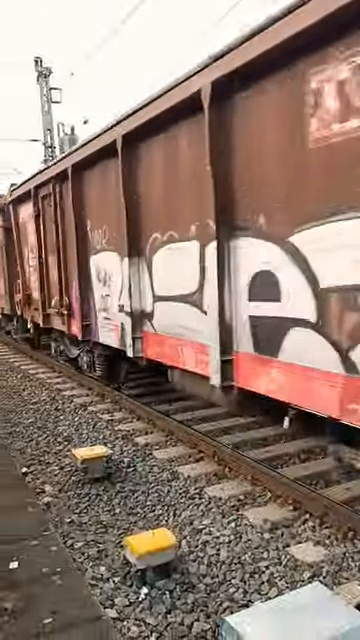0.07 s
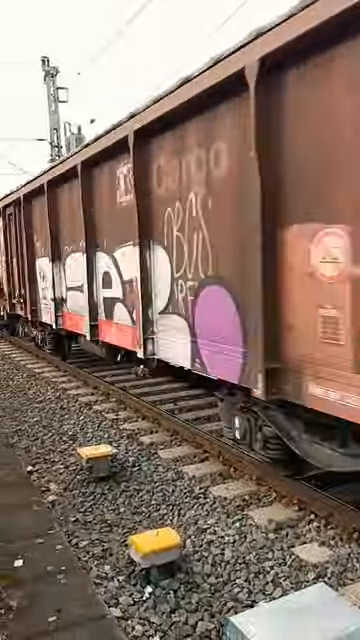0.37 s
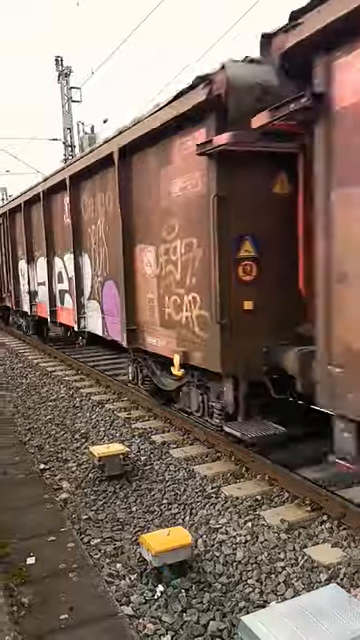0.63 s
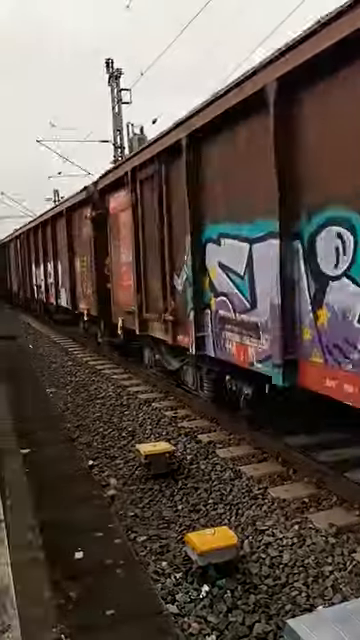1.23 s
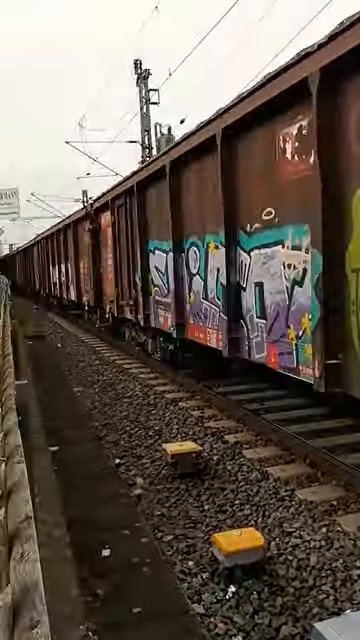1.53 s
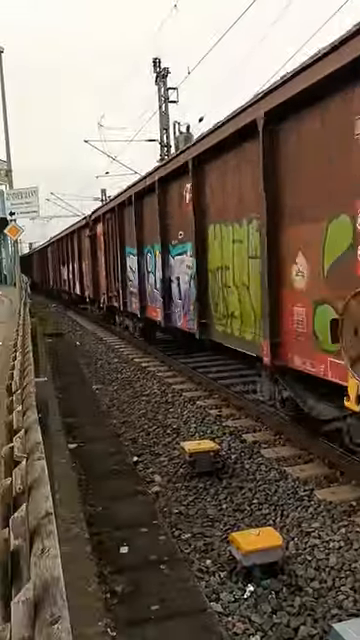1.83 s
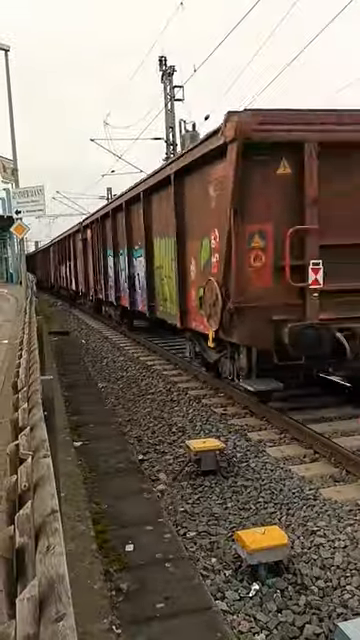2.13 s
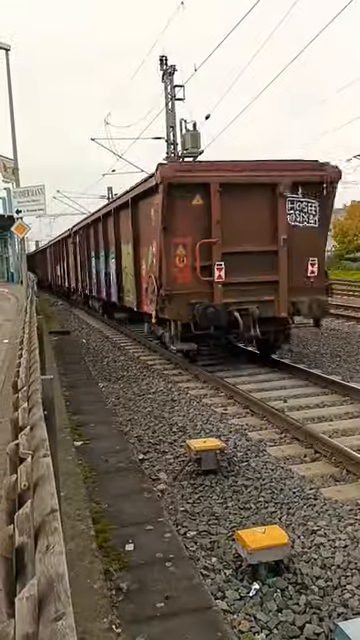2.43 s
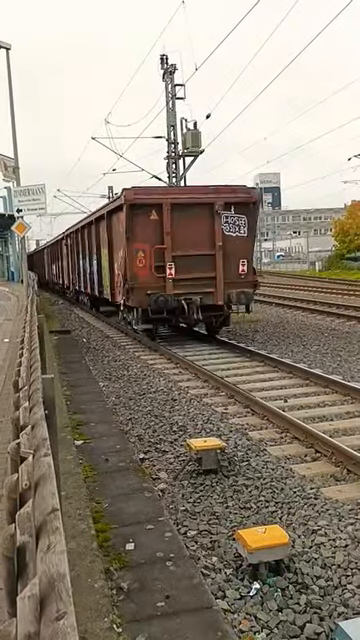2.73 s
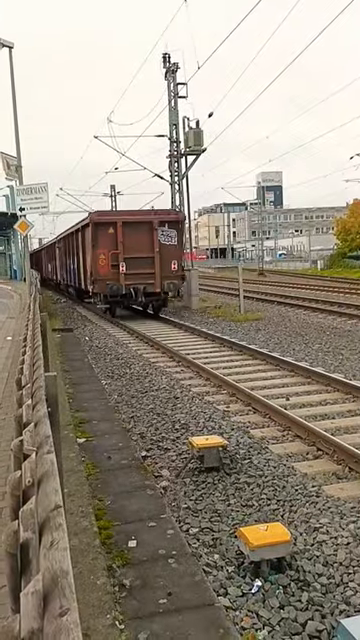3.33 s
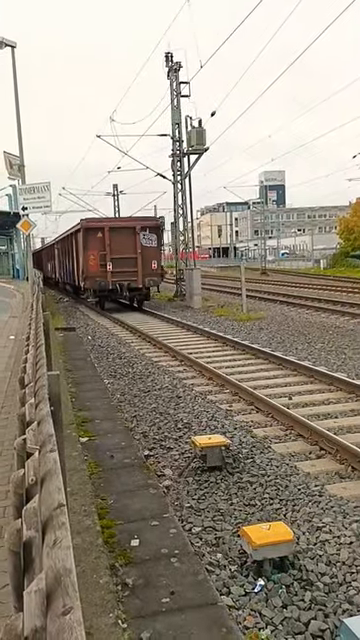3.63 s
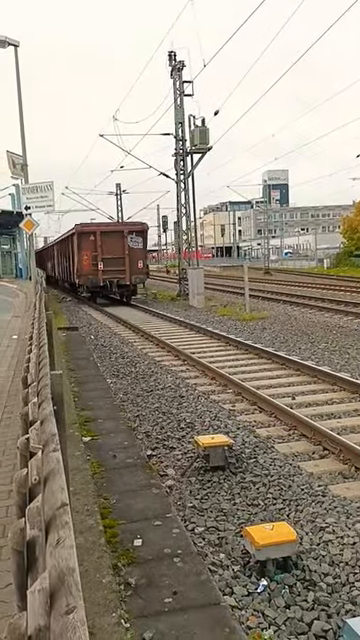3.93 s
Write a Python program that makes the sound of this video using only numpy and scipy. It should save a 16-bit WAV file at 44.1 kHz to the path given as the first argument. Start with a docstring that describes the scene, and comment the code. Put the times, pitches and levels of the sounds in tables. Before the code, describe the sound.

A freight train's last wagons roll by with rumble, clanks and hissing wheels, then recede.

```python
"""Rumble and wheel thuds as the last open wagons of a freight train pass a trackside microphone pair.
Hollow steel bodies boom, couplings clank, and flanges scrape the rail, squeal briefly and grind in
two long hisses, one near, one far. The train draws away with distant clacks and light wind in its wake.
It is to the right, so the left channel hears it later."""
import sys
import numpy as np
from scipy import signal
from scipy.fft import rfft, irfft, next_fast_len
from scipy.io import wavfile
from scipy.ndimage import uniform_filter1d, map_coordinates

SR = 44100
rng = np.random.default_rng(int(sys.argv[2]) if len(sys.argv) > 2 else 0)


def inscribe(sig):
    """Save sig as 16-bit PCM at rate SR to the path in sys.argv[1].

    A 1-D sig is mono; a 2-D sig holds one channel per row.
    Samples are clipped to [-1, 1] before scaling.
    """
    pcm = np.round(np.clip(np.atleast_2d(sig).T, -1, 1) * 32767)
    wavfile.write(sys.argv[1], SR, pcm.astype(np.int16))


N = 176400
T = np.arange(N) / SR

# likeness of the two channels: freq_hz, correlation
NEAR_COHERENCE = [(120, 0.91), (300, 1), (500, 0.73), (720, 1), (1000, 0), (1400, 0.43), (2200, 0.23),
                  (3200, 0.1), (10000, 0.1)]
FAR_COHERENCE = [(250, 0.88), (450, 0.97), (700, 0.92), (1400, 0.14), (2300, 0.36), (3300, 0.05),
                 (10000, 0.19)]
NEAR_LAG_S, FAR_LAG_S = 0.000824, 0.00096  # left behind right


def amp(db):
    """Decibels to gain."""
    return 10 ** (np.asarray(db) / 20)


def unit(x):
    """Scale to rms 1."""
    return x / np.sqrt(np.mean(x ** 2) + 1e-20)


def along(points, hz):
    """Interpolate (freq_hz, value) rows on a log axis."""
    freqs_hz, values = np.transpose(points)
    return np.interp(np.log(hz + 1), np.log(freqs_hz + 1), values)


def level(rows):
    """Gain from (time_s, level_db) rows, fading 69 dB/s beyond their ends."""
    times_s, db = np.transpose(rows)
    outside_s = np.abs(T - np.clip(T, times_s[0], times_s[-1]))
    return amp(np.interp(T, times_s, db) - 69 * outside_s)


def gate(start_s, hold_s, attack_s, release_s):
    """Linear attack, exponential release from start_s + hold_s."""
    return np.clip((T - start_s) / attack_s, 0, 1) * np.exp(-np.maximum(T - start_s - hold_s, 0) / release_s)


def wobble(knots_per_s):
    """Smooth random curve, rms about 1."""
    return map_coordinates(rng.standard_normal(int(N * knots_per_s / SR) + 4), [T * knots_per_s])


def filtered(x, response):
    """Apply the frequency response response(hz)."""
    size = next_fast_len(N + SR // 4)
    return irfft(rfft(x, size) * response(np.fft.rfftfreq(size, 1 / SR)), size)[..., :N]


def from_right(x, lag_s):
    """Two channels, the left one later."""
    return filtered(x, lambda hz: np.exp(1j * np.pi * hz * lag_s * np.array([[-1], [1]])))


def rush(spectrum, coherence, lag_s, patchy_db, rail_ring=0):
    """Stereo noise, rms 1, with narrow resonances coming and going; rail_ring adds the rail's."""
    bins_hz, frames_s, cells = signal.stft(rng.standard_normal((2, N)), SR, nperseg=1024)
    patches = uniform_filter1d(rng.standard_normal(cells.shape[1:]), size=2, axis=0)
    patches = uniform_filter1d(patches, size=7, axis=1)
    lift_db = rail_ring * rail_lift_db(bins_hz, frames_s) if rail_ring else 0
    pair = signal.istft(cells * amp(patchy_db * unit(patches) + lift_db), nperseg=1024)[1][:, :N]

    def mid_side_gains(hz):
        angle = np.arccos(np.clip(along(coherence, hz), -1, 1)) / 2
        return amp(along(spectrum, hz)) * [np.cos(angle), np.sin(angle)]

    mid, side = filtered(pair, mid_side_gains)
    return unit(from_right(np.array([mid + side, mid - side]), lag_s))


def ringing(modes):
    """Stereo noise, rms 1, through narrow resonances."""
    def response(hz):
        return sum(amp(db) / (1 + ((hz - centre_hz) / width_hz) ** 2) for centre_hz, width_hz, db in modes)

    shake = rng.standard_normal(N) + 0.5 * rng.standard_normal((2, N))
    return unit(filtered(shake, response))


def rolling():
    """Low rumble and the roar of wheel on rail, from the nearest wagons and the train beyond."""
    # envelopes: time_s, level_db
    rumble_levels = [(0, -19), (.35, -21.5), (.44, -19), (.56, -17.5), (.88, -26), (1.05, -19.5),
                     (1.26, -25), (1.37, -21), (1.53, -26), (1.63, -24.5), (1.93, -37), (2.05, -36.5),
                     (2.3, -32.5), (2.6, -40.5)]
    roar_levels = [(0, -31), (.5, -25.5), (.85, -29), (.92, -32), (1.04, -24.5), (1.125, -28.5),
                   (1.18, -30.5), (1.26, -32), (1.4, -34), (1.6, -35.5), (2.05, -45.5), (2.2, -59)]
    far_roar_levels = [(0, -42), (2.2, -33), (2.45, -38), (3.1, -33.5), (3.4, -39.5), (4, -41)]
    # spectra: freq_hz, density_db
    rumble_spectrum = [(15, -35), (30, -30), (50, -12.5), (75, -0.7), (110, -2), (170, -6.5), (260, -0.5),
                       (330, -2.5), (420, -13.5), (600, -13.5), (1000, -33), (2500, -55)]
    far_rumble_spectrum = [(15, -25), (30, -13), (50, -0.5), (75, 1), (115, 0.3), (170, -4.5), (250, 2.5),
                           (320, -9.5), (420, -13.5), (700, -22), (2000, -51)]
    roar_spectrum = [(200, -10), (450, 3.5), (650, 0), (900, -1.5), (1400, -6), (2400, -12.5),
                     (3300, -13.5), (9000, -20), (15000, -32)]
    far_roar_spectrum = [(200, -15), (450, 0), (650, 0.5), (860, 4), (1400, -2.5), (2050, -1), (2750, -2),
                         (3300, -7.5), (5000, -11), (9000, -15.5), (12000, -18.5), (15000, -38)]
    near, far = (NEAR_COHERENCE, NEAR_LAG_S), (FAR_COHERENCE, FAR_LAG_S)
    rumble = level(rumble_levels) * amp(1.3 * wobble(25.23)) * rush(rumble_spectrum, *near, patchy_db=4)
    far_rumble = amp(-32) * rush(far_rumble_spectrum, *far, patchy_db=1)
    roar = level(roar_levels) * amp(2.28 * wobble(25.24)) * rush(roar_spectrum, *near, patchy_db=2.5)
    far_gain = level(far_roar_levels) * amp(1.6 * wobble(25.36))
    far_roar = far_gain * rush(far_roar_spectrum, *far, patchy_db=3)
    return rumble + far_rumble + roar + far_roar


def flanges():
    """Flanges rub the rail head with an uneven hiss, more hollow and ringing further away."""
    # long grinds: time_s, relative_db
    near_grind = [(1.28, -40), (1.308, -30.5), (1.382, -24), (1.612, -28), (1.628, -21.5), (1.968, -20),
                  (2.088, -23), (2.152, -42), (2.2, -51)]
    far_grind = [(2.5, -47), (2.564, -33), (2.666, -31.5), (2.758, -21.5), (2.92, -19), (3.165, -27),
                 (3.186, -38), (3.208, -30), (3.26, -33), (3.36, -49.5)]
    # short scrapes: start_s, hold_s, level_db, far_share
    scrapes = [(0, 0.28, -38, 0.17), (0.204, 0.095, -31, 0.24), (0.321, 0.057, -27.5, 0.12),
               (0.491, 0.055, -24.5, 0.33), (0.572, 0.042, -27.5, 0), (0.655, 0.066, -22, 0.018),
               (0.755, 0.097, -26, 0.016), (0.868, 0.078, -27, 0.33), (0.954, 0.054, -23, 0.042),
               (1.026, 0.025, -28, 0.074), (1.136, 0.058, -22.5, 0.052), (1.232, .07, -36, 0.23),
               (3.455, 0.033, -32.5, 0.95), (3.54, 0.017, -43.5, 1), (3.66, 0.12, -40, 0.67)]
    # hiss spectra: freq_hz, density_db
    near_spectrum = [(250, -25), (480, -26), (700, 1.5), (950, 0), (1400, -0.8), (1900, 0.5), (2600, 0.0),
                     (3200, -3), (4500, -3), (6100, -3), (7700, -7.5), (9400, -3.5), (11500, -9.5),
                     (14000, -17), (15300, -36)]
    far_spectrum = [(250, -21), (450, -11), (650, -10), (900, -10.5), (1250, -9.5), (1600, -7),
                    (2600, -4.5), (3150, -8), (4400, -10), (6200, -9.5), (8000, -11.5), (9400, -11.5),
                    (11500, -13.5), (14000, -20), (15300, -37)]
    near_gain, far_gain = amp(4) * level(near_grind), amp(2.5) * level(far_grind)
    for start_s, hold_s, level_db, far_share in scrapes:
        scrape = amp(level_db) * gate(start_s, hold_s, attack_s=.014, release_s=.036)
        near_gain = np.hypot(near_gain, (1 - far_share) * scrape)
        far_gain = np.hypot(far_gain, far_share * scrape)
    chatter = amp(.7 * wobble(45) + .7 * wobble(400))
    near_hiss = rush(near_spectrum, NEAR_COHERENCE, NEAR_LAG_S, patchy_db=3.5, rail_ring=0.13)
    far_hiss = rush(far_spectrum, FAR_COHERENCE, FAR_LAG_S, patchy_db=3.5, rail_ring=0.97)
    return chatter * (near_gain * near_hiss + far_gain * far_hiss)


def rail_lift_db(bins_hz, frames_s):
    """Resonances of rubbing wheel and rail; each drifts and swells as the contact point moves."""
    # resonances: centre_hz, width_hz, lift_db
    rail_modes = [(700, 18, 1), (890, 48, 6), (1008, 36, 6), (1950, 115, 6), (2380, 130, 4.5),
                  (2790, 120, 4), (3610, 140, 3.5), (5230, 130, 3.5), (6220, 160, 3), (7300, 220, 3),
                  (9420, 470, 4)]
    total_db = 0
    for centre_hz, width_hz, lift_db in rail_modes:
        peak_db = lift_db * (1 + .2 * np.interp(frames_s, T, wobble(22)))
        peak_hz = centre_hz * (1 + .007 * np.interp(frames_s, T, wobble(22)))
        total_db += peak_db * np.exp(-((bins_hz[:, None] - peak_hz) / width_hz) ** 2)
    return total_db


def squeals():
    """Stick and slip briefly lock onto one wheel mode; a loose grip makes a rough chirp."""
    # squeals: start_s, hold_s, level_db, pitch_hz, rise_hz_per_s, roughness
    chirps = [(.165, .085, -27.5, 1970, 350, .16), (.235, .03, -32, 2050, 2000, .5),
              (.34, .07, -34, 2200, 4800, 1), (.57, .085, -32, 9120, -300, .3),
              (.585, .04, -38, 7570, 0, .2), (.71, .028, -32, 10130, 0, .2),
              (.775, .06, -38, 9570, -300, .3), (.865, .22, -35, 9560, -400, .3),
              (.87, .05, -34, 8110, -400, .2), (.87, .085, -33, 2720, -4200, .6),
              (1.25, .06, -34, 1920, -1000, .4), (1.35, .11, -31.5, 3330, 0, .1),
              (1.765, .08, -30, 5900, 600, .9)]
    wander_hz, flutter_db = 110, 2.5
    out = np.zeros(N)
    for start_s, hold_s, level_db, pitch_hz, rise_hz_per_s, roughness in chirps:
        hz = pitch_hz + rise_hz_per_s * (T - start_s) + roughness * wander_hz * wobble(200)
        grip = amp(level_db + flutter_db * (wobble(100) + wobble(30)))
        tone = np.sin(2 * np.pi * np.cumsum(hz) / SR)
        out += grip * gate(start_s, hold_s, attack_s=.028, release_s=.01) * tone
    return from_right(out, lag_s=.00095)


def thuds():
    """A wheel meets a rough spot and shakes its bogie."""
    # wheel impacts: start_s, relative_db, pitch_hz
    impacts = [(0.189, -17.5, 100), (.259, -14, 121.5), (.325, -14.5, 90), (.503, -16, 90),
               (0.664, -18.5, 120), (.96, -10.5, 77.4), (1.02, -12, 117.7), (1.134, -12, 95.2),
               (1.168, -26, 109), (1.565, -14, 92), (1.824, -13.5, 106.4), (1.985, -18, 91),
               (2.033, -22, 120.3), (2.39, -25, 110.3), (3.234, -30.5, 126.4), (3.704, -29, 120)]
    # bogie modes: pitch_ratio, gain_db, t60_s
    bogie_modes = [(.66, -8.5, 0.12), (0.999, -3, 0.15), (1.45, -3, 0.095), (2.25, -8, 0.11),
                   (3.4, -16, 0.027)]
    attack_s, boost_db = 0.011, 12
    out = np.zeros(N)
    for start_s, relative_db, pitch_hz in impacts:
        age_s = np.maximum(T - start_s, 0)
        onset = amp(relative_db + boost_db) * (1 - np.exp(-age_s / attack_s))
        for pitch_ratio, gain_db, t60_s in bogie_modes:
            decay = amp(gain_db + rng.normal(0, 1.3) - 60 * age_s / t60_s)
            out += onset * decay * np.sin(2 * np.pi * pitch_hz * pitch_ratio * age_s)
    return from_right(out, NEAR_LAG_S)


def clanks():
    """Couplings and loose fittings knock: a dull band of noise plus the ring of the coupling gear."""
    # steel knocks: start_s, hold_s, knock_db, centre_hz, ring_db
    knocks = [(0.191, 0.029, -28.5, 1110, -31.5), (0.336, .04, -33.5, 1000, -30),
              (0.462, 0.017, -28.5, 1100, -35), (0.506, 0.038, -31, 980, -29),
              (0.541, 0.022, -24, 480, -45), (0.654, .02, -34, 1030, -22.5),
              (0.781, 0.035, -23.5, 503, -37), (0.968, 0.018, -21.5, 2250, -23),
              (0.985, 0.013, -24, 985, -28.5), (1.028, 0.013, -22, 560, -42), (1.082, 0.015, -28, 473, -27),
              (1.163, 0.017, -31, 1000, -37), (1.286, 0.042, -17, 472, -42),
              (1.294, 0.02, -28.5, 1210, -36), (1.825, 0.017, -33, 435, -40),
              (1.983, 0.019, -28, 1150, -23), (2.008, 0.017, -36, 430, -42), (2.185, 0.016, -35, 885, -51)]
    # coupling gear modes: centre_hz, width_hz, gain_db
    gear_modes = [(818, 20, 3), (984, 48, 0.5), (1197, 40, -6.5), (2104, 58, -0.5), (2280, 50, -13),
                  (2500, 35, -14), (2940, 35, -2)]
    log_width, attack_s = 0.38, 0.014
    out, gear = np.zeros((2, N)), ringing(gear_modes)
    for start_s, hold_s, knock_db, centre_hz, ring_db in knocks:
        shake = rng.standard_normal(N) + 0.71 * rng.standard_normal((2, N))
        knock = filtered(shake, lambda hz: 1 / (1 + (np.log((hz + 1) / centre_hz) / log_width) ** 4))
        out += amp(knock_db) * gate(start_s, hold_s, attack_s, release_s=0.022) * unit(knock)
        out += amp(ring_db) * gate(start_s, hold_s, attack_s, release_s=0.027) * gear
    return from_right(out, NEAR_LAG_S)


def booms():
    """An empty wagon body swells on one wavering low note."""
    # body booms: start_s, hold_s, level_db, pitch_hz
    swells = [(0.311, 0.068, -22.5, 325.4), (0.539, 0.056, -16, 255), (1.306, 0.081, -19, 251.9),
              (1.616, 0.034, -28, 285.6), (2.11, 0.097, -21.5, 247.2), (2.379, 0.05, -25.5, 236)]
    out = np.zeros(N)
    for start_s, hold_s, level_db, pitch_hz in swells:
        wavering_hz = pitch_hz * (1 + 0.0335 * wobble(70))
        tone = unit(np.sin(2 * np.pi * np.cumsum(wavering_hz) / SR) * amp(0.81 * wobble(65)))
        out += amp(level_db) * gate(start_s, hold_s, attack_s=0.014, release_s=0.018) * tone
    return from_right(out, NEAR_LAG_S)


def wind():
    """Light buffeting in the train's wake; the right microphone port catches more."""
    # wake envelope: time_s, relative_db
    wake_levels = [(0, -10), (3.1, -10), (3.5, -1), (4, 8.5)]
    # buffeting spectrum: freq_hz, density_db
    spectrum = [(15, -14), (40, 1.5), (70, 1), (130, -13), (400, -59)]
    right_lead_db = 2.5
    ports = amp(right_lead_db * np.array([[-.5], [.5]]))
    gusts = amp(-40.5 + 1.4 * wobble(8.7)) * level(wake_levels)
    return ports * gusts * rush(spectrum, coherence=[(50, 0.13)], lag_s=0, patchy_db=3.5)


def clacks():
    """Wheels far down the track jolt the rail, which rings on a few high modes."""
    # wheel jolts: start_s, hold_s, level_db
    jolts = [(3.197, 0.066, -37), (3.457, .035, -37), (3.665, .1, -43.5)]
    # rail modes: centre_hz, width_hz, gain_db
    rail_modes = [(1790, 60, 3), (2800, 74, 3.5), (3580, 45, 3), (5200, 55, -1), (6200, 50, -4),
                  (7500, 55, -4), (8900, 60, -3)]
    envelope = sum(amp(level_db) * gate(start_s, hold_s, attack_s=.008, release_s=0.028)
                   for start_s, hold_s, level_db in jolts)
    return from_right(envelope * ringing(rail_modes), FAR_LAG_S)


def scene():
    """Everything heard from beside the track."""
    return rolling() + flanges() + thuds() + booms() + clanks() + clacks() + squeals() + wind()


def record(dry):
    """Tilt the balance to the left and cut everything above top_hz."""
    # channel balance: freq_hz, left_over_right_db
    balance = [(60, 4), (110, 2.5), (200, 6), (380, 4), (700, 3.0), (1290, 1), (2380, 5.5), (4390, 2.5),
               (8110, 2.5), (15000, 0.5)]
    top_hz = 15450
    return filtered(dry, lambda hz: amp(along(balance, hz) * np.array([[.5], [-.5]])) * (hz < top_hz))


dry = scene()
out = record(dry)
inscribe(out)
```